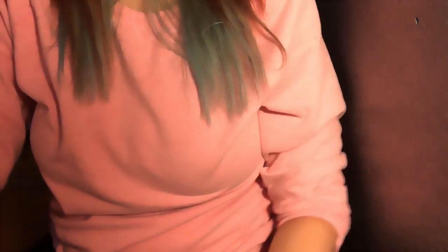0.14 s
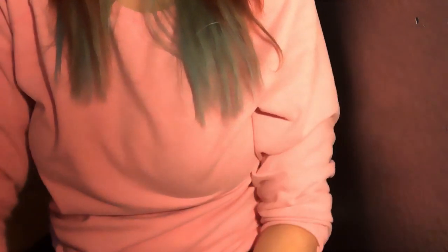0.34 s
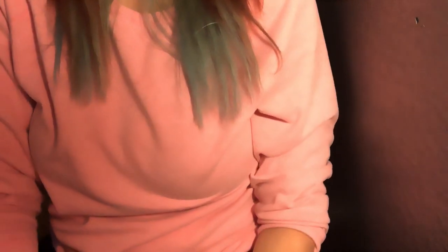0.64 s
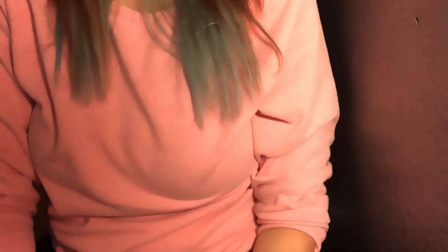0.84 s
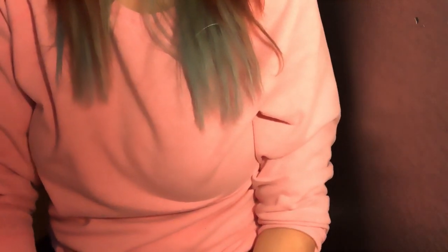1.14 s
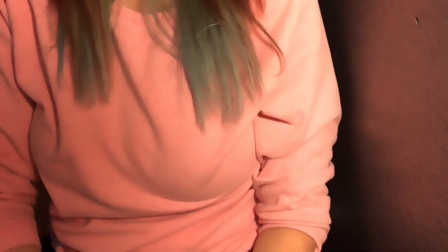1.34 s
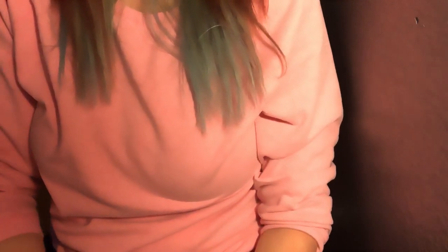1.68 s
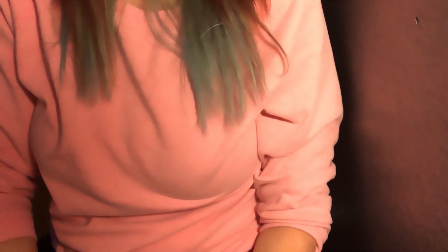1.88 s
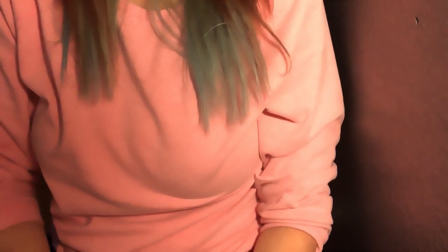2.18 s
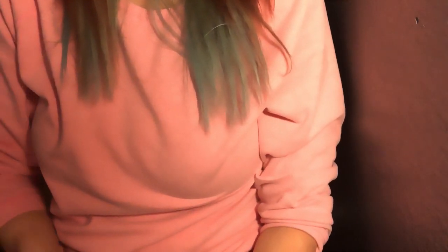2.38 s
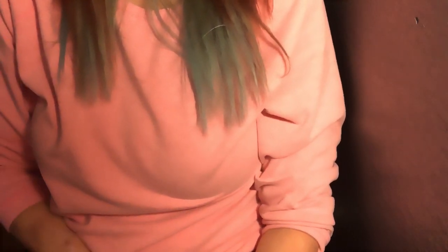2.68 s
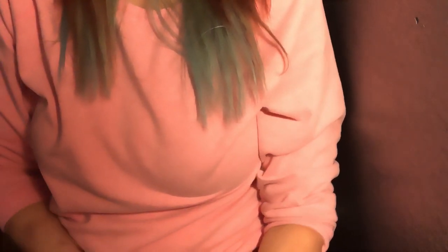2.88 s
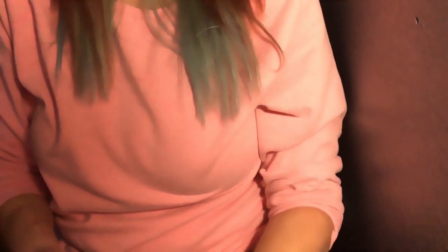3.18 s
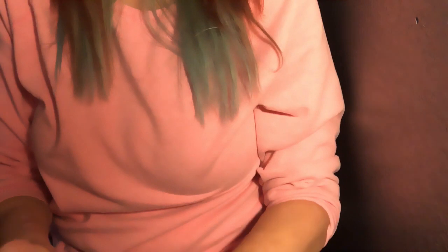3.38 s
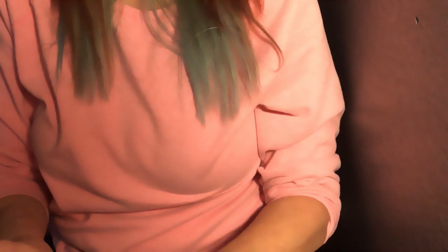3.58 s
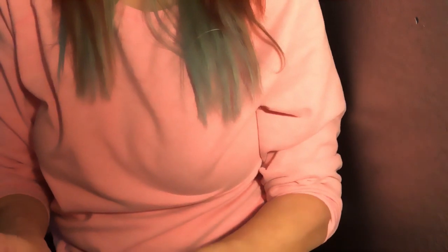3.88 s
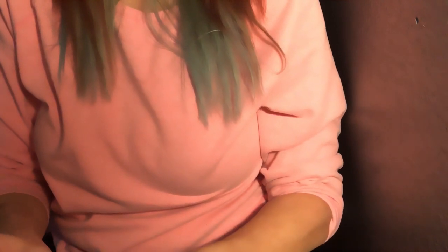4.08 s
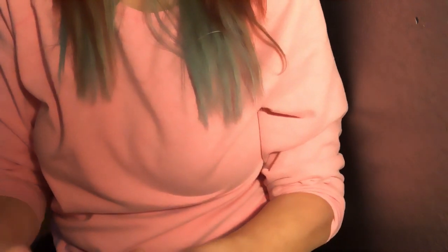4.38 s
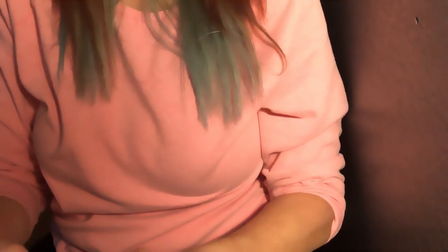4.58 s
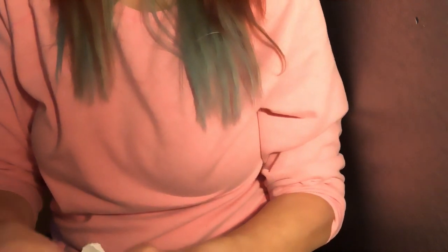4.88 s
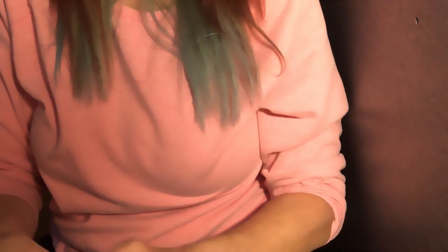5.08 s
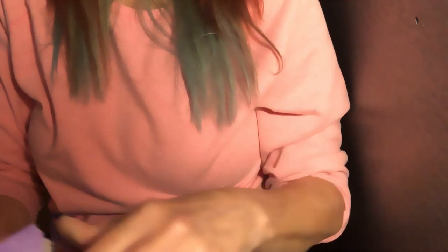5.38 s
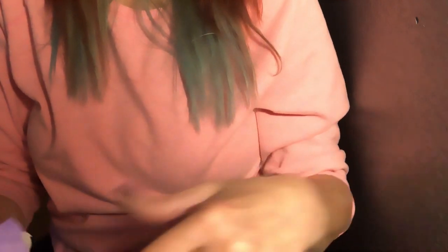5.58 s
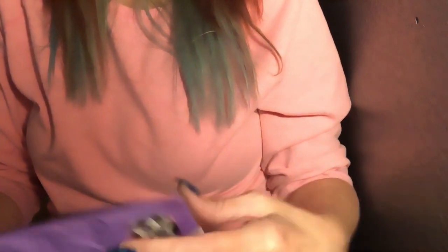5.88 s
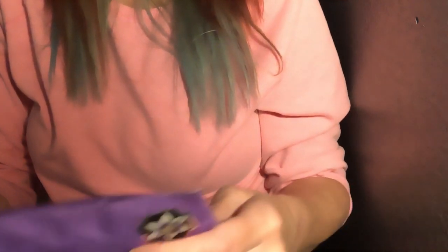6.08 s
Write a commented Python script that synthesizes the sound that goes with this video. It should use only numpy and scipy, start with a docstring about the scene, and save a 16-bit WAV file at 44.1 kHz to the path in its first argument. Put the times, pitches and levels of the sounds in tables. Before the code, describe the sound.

Hands tear open a paper envelope close to the microphone in a quiet room. Short, grainy rips and sharp snaps of creased paper come in irregular clusters through the first half. The handling then drops to faint ticks and rubbing before softer rustling and crinkling pick up again. The paper sounds slightly hollow, over a steady low hiss and faint hum.

```python
"""A paper envelope is crinkled and torn open by hand just above a desk, close-miked in a quiet room.
Creases snap one by one, each with a click, a short ring and a flap of the sheet. Fibres rip in dense
grains, and sliding fingers add softer swells of rustle. Air under and inside the envelope resonates
and gives the paper a hollow colour. Behind it sit a short room tail, steady hiss and a faint hum."""
import sys
import numpy as np
from scipy import signal
from scipy.fft import rfft, irfft, next_fast_len
from scipy.io import wavfile
from scipy.ndimage import uniform_filter1d

SR = 44100
rng = np.random.default_rng(int(sys.argv[2]) if len(sys.argv) > 2 else 0)


def unload_audio(sound):
    """Save the sound as a 16-bit wav file, at the path given as the first command line argument."""
    columns = np.transpose(np.atleast_2d(sound))
    # keep every value between -1 and 1, then stretch to whole-number steps
    steps = np.round(np.clip(columns, -1, 1) * 32767)
    wavfile.write(sys.argv[1], SR, steps.astype(np.int16))


N = 275625

# Tone of the room and microphone noise: f/Hz, level/dB
NOISE_EQ = [(21, -52), (35, 3), (98, 2.5), (167, -2), (342, -3), (587, -6), (955, -12.5), (1090, -13.5),
            (1680, -18.5), (2660, -21), (7050, -18.5), (14800, -25), (16000, -39)]
# Fingers slide over the sheet: t/s, hold/s, body level/dB, crackle/dB, flap/dB (last two re body)
FINGER_SLIDES = [(.08, 0.073, -60.5, -24, -6), (.2, 0.081, -59.5, 0.5, -4), (.725, 0.022, -50.5, 0, -10),
                 (.96, 0.018, -57.5, -16, -15), (1.645, 0.01, -54.5, 1.5, -2),
                 (1.78, 0.12, -58.5, -8, -6.5), (1.98, 0.15, -61.5, -3.5, -1), (2.3, 0.055, -59, -7, -7),
                 (2.82, 0.11, -60, 6.5, 1.5), (3.26, 0.008, -62.5, -1, 0), (3.32, 0.027, -64, 1.5, -2),
                 (3.45, 0.066, -66, 1, -1), (3.72, 0.098, -73.5, -2, 6), (3.94, 0.018, -68.5, 8, -4),
                 (4.09, .01, -71, 10, 0), (4.19, 0.018, -76.5, 6, -2), (4.57, 0.05, -66.5, -10.5, 1.5),
                 (4.74, 0.093, -55.5, 7, -2.5), (4.9, 0.14, -60, 1, -6), (5.31, 0.045, -58.5, 6, -9),
                 (5.42, 0.18, -57.5, 7, -9), (5.65, 0.14, -59, -2, -10), (5.84, 0.063, -64.5, 9, -15),
                 (6.03, 0.024, -55.5, 0, -9.5), (6.13, 0.16, -60, -2.5, -14)]
# Fibres rip, sudden and loud: t/s, hold/s, body level/dB, crackle/dB, flap/dB (last two re body)
FIBRE_RIPS = [(.363, 0.0058, -47, 3.5, -7), (.392, .005, -46, 3, -27), (.42, 0.014, -43.5, 7, -18),
              (.445, 0.04, -40.5, 6, -1.5), (.87, 0.03, -43.5, 4, -30), (1.215, 0.078, -55.5, 1, 1.5),
              (1.335, 0.048, -50.5, -1, -4), (1.43, 0.11, -47.5, 0.5, -5), (2.178, 0.011, -47.5, -5, -5.5),
              (2.38, 0.0114, -40.5, -4, -7.5), (2.49, .055, -48, 2.5, -2.5), (2.575, 0.043, -52, 5, -5),
              (2.903, 0.022, -51, -9, 0), (3.205, 0.014, -65, 4.5, 3), (3.563, 0.066, -58.5, 3.5, -5.5),
              (4.362, 0.079, -64.5, -12.5, -0.5), (4.69, 0.027, -52.5, 5, -6), (5.175, 0.065, -56, -6, -9),
              (5.595, .015, -56.5, -13, 7.5), (5.918, 0.0021, -50, -22, -17)]
# Creases snap: t/s, level/dB, length/ms, ring f/Hz, flap trim/dB, bite trim/dB, crackle trim/dB
CREASE_SNAPS = [(0.1888, -46, 2.5, 584, 9, -12, -5), (0.1999, -44, 2.6, 800, 13.5, -26, -15),
                (0.2043, -39, 2.7, 875, -2, -36, -18), (0.2538, -39, 2.3, 1090, -2.5, -11, -27),
                (0.3578, -26.5, 6.3, 1440, 0, 5, -2.5), (0.389, -34, 6.8, 4760, -23, -10, -8),
                (0.3992, -30, 2.8, 4500, -37, -11, 2), (0.423, -34, 3.8, 4850, -10, -14, -7),
                (0.4432, -19, 1.55, 5560, -9, -2, 0), (0.478, -30, 4.2, 840, -1, -1, -18),
                (0.518, -49, 2, 3970, -15, 4, -1), (0.8092, -46.5, 1.3, 1560, -13, -17, 10.5),
                (0.843, -45, 1.2, 2610, 4, -3, 9), (0.867, -37, 4.9, 2670, 1.5, -5, 9),
                (0.8892, -21, 2.38, 3300, -7.5, 16, 0), (0.9167, -34.5, 12, 2100, -9, 20, 3),
                (0.9237, -40, 8.2, 2180, -12, 2, -9), (1.022, -49.5, 1.26, 2450, -22, 4, 3),
                (1.0758, -45.5, 1.4, 5400, -19, 3, -3), (1.0804, -42, 1.2, 5440, -24, 3, 0),
                (1.2068, -16.5, 1.94, 5430, -4.5, 1, -5), (1.2409, -34.5, 1.27, 2400, 0, 41, 4.5),
                (1.279, -35, 3.8, 1530, -16, 25, 1.5), (1.3111, -29, 1.17, 2240, 5.5, 7, -16),
                (1.3208, -37.5, 13.3, 537, -3, -26, -6), (1.3377, -16, 3, 2310, -37, 5, -7),
                (1.4096, -38, 11, 2140, -20, 8, -3.5), (1.4243, -32.5, 1.55, 1660, 1.5, 2, -1),
                (1.4432, -26, 3.1, 950, -4.5, -5.5, -37), (1.4723, -29, 1.08, 2320, -16, 5, 5.5),
                (1.4785, -41, 3.4, 2380, -24, 0, 2), (1.4993, -26, 4.8, 2320, -12.5, 2.5, -8),
                (1.5276, -43.5, 5.8, 2500, -19, -12, 3), (1.5615, -37, 2.35, 2370, -31, 6, 1.5),
                (1.8377, -49, 1.3, 1610, -18, 2, 5), (1.8915, -50.5, 3.7, 2350, -22, 5, -0.5),
                (2.0425, -45, 1.26, 2500, -19, -3, 3), (2.0587, -49, 5.5, 2280, -1, 5, -2),
                (2.1692, -25.5, 5.1, 2820, -3.5, 14, -5.5), (2.2216, -47.5, 4.4, 2230, -19, 0, -1),
                (2.2739, -44.5, 1.1, 2330, -13, -4, 3), (2.2992, -58, 1.9, 2330, -14, -3, -7),
                (2.3201, -52.5, 2.9, 2450, 7, 0, 11), (2.3299, -39, 1.3, 2240, -24, 3, 1),
                (2.3358, -32, 0.69, 2390, -24, 1, 2), (2.36, -46, 2, 2400, -16, -11, -8),
                (2.3727, -26.5, 3.4, 3000, -5.5, 23, -5.5), (2.377, -30, 1.75, 2440, -13, -3, 4),
                (2.384, -34.5, 4.1, 4900, 1, -19, -5), (2.398, -44, 1.4, 730, 2, -10, -13),
                (2.4431, -38, 1.9, 2200, -5, 11, 2), (2.4595, -40, 1.4, 4000, -23, -9, -5),
                (2.4705, -42, 1.7, 1370, -24, 0, 4.5), (2.482, -24.5, 2.38, 1240, -7, 15, 0),
                (2.503, -55, 3.7, 2400, -10, 3, -8), (2.5307, -30.5, 14.5, 4250, -12, 16, 3),
                (2.568, -45, 1.3, 3500, -2, -6, 6), (2.6068, -38, 3.1, 2610, 4, 4, 9.5),
                (2.7829, -45, 3.7, 5250, -23, -13, 6), (2.7883, -47.5, 4.3, 4800, -11, 3, 6),
                (2.8003, -48, 2.3, 5190, -3, -4, 11), (2.8149, -41.5, 3.3, 596, 2.5, -8, -2),
                (2.8369, -42.5, 1.7, 517, -18, -4, 2), (2.8763, -33.5, 1.7, 950, 0.5, -9, -22),
                (2.8984, -23.5, 3.15, 2110, -7, 4, -15.5), (2.9827, -50.5, 11.4, 640, -3, -2.5, -2),
                (3.0965, -59, 3, 520, -9, 5, 4), (3.5541, -28, 2.5, 915, -5, 5.5, -39),
                (3.5591, -47.5, 6, 980, -9, -15.5, -2), (3.5726, -46, 1.4, 1710, -21, -23, -31),
                (3.7857, -48.5, 0.77, 1920, 5.5, -2, -15), (4.2133, -46, 1.58, 900, 7, -17, -12.5),
                (4.3433, -39.5, 1.2, 520, -11, 10, -17), (4.3682, -37, 2.7, 1670, -6.5, 33, -5),
                (4.6772, -44, 4.3, 1370, -2, 13, -1), (4.6896, -47.5, 8.3, 3340, 1, -10, 7),
                (4.8418, -37.5, 1.2, 890, -0.5, -19, -22), (4.9498, -41, 2.2, 530, 6.5, -16, -12),
                (5.0241, -55, 9.1, 1750, -5, 2, -14), (5.0654, -42, 1.8, 535, 0, -18, -15),
                (5.1643, -26.5, 1.82, 2080, -10, 7, -35), (5.2265, -45, 2.3, 1640, -1, -8, -15.5),
                (5.2539, -51.5, 4.6, 520, 12.5, -21, -21), (5.5355, -37.5, 0.78, 1780, 0, -18.5, -27),
                (5.5902, -35.5, 0.7, 1180, 1.5, -20, -14), (5.6017, -46.5, 2.2, 526, 2, -20, -14),
                (5.6855, -39.5, 3.75, 1530, 0.5, -6, -30), (5.7303, -47, 2.5, 1230, -2, -2, -1),
                (5.7357, -44, 4.8, 1510, 2, -28, -41), (5.9199, -33, 4.7, 1620, -4, 7, -16),
                (6.1154, -42.5, 0.95, 1860, 5.5, -8, -14), (6.1227, -33, 3.9, 580, -6, 9, -17.5),
                (6.1277, -45, 2.4, 1140, -2, 11, -18), (6.1594, -44.5, 3.6, 1230, 8, -7, -32)]
# Modes of the air gap under the envelope: f/Hz, width/Hz, level/dB
GAP_MODES = [(2320, 546, 1), (4960, 1100, -5.5), (7340, 920, 1.5), (10000, 1500, -1.5), (12230, 910, -1),
             (14900, 1300, 4)]
# Modes of the open pocket inside it: f/Hz, width/Hz, level/dB
POCKET_MODES = [(353, 120, -8.5), (950, 120, -10.5), (1545, 776, -1)]
# Sends into those two hollows over time: t/s, gap level/dB, pocket level/dB
HOLLOW_SENDS = [(0, 12, 3), (.3, 4, 12), (.7, 10.5, 3.5), (.9, 2.5, -3.5), (1.2, 7, 9.5), (1.4, 2.5, 4),
                (1.6, 13.5, 4), (2.3, 5.5, -1), (2.6, -2.5, 2), (2.9, 10.5, 11), (3.3, -10, 1.5),
                (3.6, 8, 20), (4.4, -8.5, 10.5), (5.0, -38, 6), (5.3, -3, -1), (5.6, -26, 4.5),
                (6.25, -9, 7)]
# Overall tone of the paper: f/Hz, level/dB
PAPER_EQ = [(200, 0.5), (400, 1), (900, -0.5), (1600, -2), (2500, -1.5), (4000, 5), (6000, 0), (9000, -3),
            (12000, -5.5), (16000, -11)]

BANDS_HZ = (150, 700, 6000, 17500)   # edges of the paper's three bands: flap, body, crackle
HELD_DB = (-82, -74, -78)   # the envelope at rest in the hands: flap, body, crackle


def from_db(db):
    """Decibels to linear gain."""
    return 10 ** (np.asarray(db) / 20)


def rms_one(x):
    """x scaled to rms 1."""
    return x / np.sqrt(np.mean(x ** 2) + 1e-20)


def equalise(x, curve):
    """x through an EQ curve drawn on a log-frequency axis."""
    size = next_fast_len(N)
    hz = np.maximum(np.arange(size // 2 + 1) * SR / size, 1)
    curve_hz, curve_db = np.transpose(curve)
    gain = from_db(np.interp(np.log(hz), np.log(curve_hz), curve_db))
    return irfft(rfft(x, size) * gain, size)[:N]


def resonance(x, hz, width_hz):
    """One resonant band-pass, unity gain at its peak."""
    r = np.exp(-np.pi * width_hz / SR)
    poles = [1, -2 * r * np.cos(2 * np.pi * hz / SR), r * r]
    return signal.lfilter(np.array([1, 0, -1]) * (1 - r * r) / 2, poles, x)


def paper_bands(flap, body, crackle):
    """The sheet's low flap, mid body and high crackle, each filtered to its own band."""
    return [signal.sosfilt(signal.butter(3, BANDS_HZ[k:k + 2], "band", fs=SR, output="sos"), x + 1e-18)
            for k, x in enumerate((flap, body, crackle))]


def drift(rate_hz):
    """Smooth random modulation, rms 1."""
    r = np.exp(-2 * np.pi * rate_hz / SR)
    return rms_one(signal.lfilter([1], [1, -2 * r, r * r], rng.standard_normal(N + SR))[SR:])


def room_tone(hiss_db=-68.5, hum_db=-76.5):
    """A steady bed of room and microphone noise with a faint wavering hum."""
    hiss = rms_one(equalise(rng.standard_normal(N), NOISE_EQ))
    hum = rms_one(resonance(rng.standard_normal(N), hz=102.1, width_hz=13))
    return from_db(hiss_db) * hiss + from_db(hum_db) * hum


def strokes(rows, rise_db_per_s, fall_db_per_s):
    """Power of flap, body and crackle as each hand stroke swells, holds and dies away."""
    t = np.arange(0, N + 64, 64) / SR
    power = 0
    for start, hold, body_db, crackle_db, flap_db in rows:
        attack_db = rise_db_per_s * np.maximum(start - t, 0)
        release_db = fall_db_per_s * np.maximum(t - start - hold, 0)
        band_db = body_db + np.array([[flap_db], [0], [crackle_db]])
        power = power + from_db(band_db - attack_db - release_db) ** 2
    return np.array([np.interp(np.arange(N) / SR, t, band) for band in power])


def hand_effort():
    """Flap, body and crackle levels in dB: gentle slides and sharp rips over the resting hold."""
    slides = strokes(FINGER_SLIDES, rise_db_per_s=169, fall_db_per_s=135)
    rips = strokes(FIBRE_RIPS, rise_db_per_s=896.5, fall_db_per_s=291)
    return 10 * np.log10(slides + rips + from_db(HELD_DB)[:, None] ** 2)


def rustle(effort_db, grains_per_s=6000, slide_db=-58, rip_db=-44, spread_db=3, clump_db=3, swell_db=1):
    """Fibres break in clumps of grains over the hiss of sliding fingers; harder pulls are rougher."""
    roughness = np.clip((effort_db[1] - slide_db) / (rip_db - slide_db), .25, 1)
    sizes = from_db(spread_db * roughness * np.minimum(rng.exponential(1, N), 4))
    grains = sizes * rng.choice([-1, 1], N) * (rng.random(N) < grains_per_s / SR)
    grains /= np.sqrt(uniform_filter1d(grains ** 2, size=2000) + 1e-9)   # even out the running level
    finger_hiss = 0.13 * rng.standard_normal(N)
    clumps = from_db(clump_db * roughness * drift(rate_hz=200) + swell_db * drift(rate_hz=20))
    texture = (grains + finger_hiss) * clumps
    bands = paper_bands(texture, texture, texture)
    return sum(from_db(db) * rms_one(band) for db, band in zip(effort_db, bands))


def shifting_folds(x, depth_db=2.2, rate_hz=8):
    """The folds shift under the fingers: half-octave bands swell and fade on their own."""
    edges_hz = np.minimum(600 * 2 ** np.arange(0, 5.1, .5), 18000)
    out = x
    for low, high in zip(edges_hz, edges_hz[1:]):
        band = resonance(x, np.sqrt(low * high), high - low)
        out = out + (from_db(depth_db * drift(rate_hz)) - 1) * band
    return out


def faint_creases(body_db, count=45, lift_db=7, spread_db=0.5):
    """Extra snap rows: small creases give way at random, as strong as the hands are busy."""
    rows = []
    for when, size, length, pitch in rng.random((count, 4)):
        level_db = body_db[int(when * N)] + lift_db + spread_db * (2 * size - 1)
        rows.append((when * N / SR, level_db, 5 * (0.36 + length), 900 * 3.5 ** pitch, -5, 4, -2))
    return rows


def snaps(rows, ring_q=1.74, bite_db=3, flap_db=10, flap_stretch=1.91):
    """A crease gives with a click and a burst of micro-breaks; a patch rings and the sheet flaps after."""
    span = 2048   # samples per snap
    t = np.arange(span) / SR
    tracks = np.zeros((3, N + span))
    for start, level_db, ms, hz, flap_trim, bite_trim, crackle_trim in rows:
        body_noise, flap_noise, crackle_noise = rng.standard_normal((3, span))
        length_s = ms / 1000
        age = t / length_s
        burst_shape = age ** 1.3 * np.exp(-3.5 * age)
        flap_shape = age ** 1.95 * np.exp(-3.5 * age / flap_stretch)
        click = np.zeros(span)
        click[np.argmax(burst_shape)] = np.linalg.norm(burst_shape) / max(ms, 1)
        burst = body_noise * burst_shape + click
        ring = resonance(resonance(burst, hz, hz / ring_q), hz, 2 * hz / ring_q)
        bite = from_db(bite_db + bite_trim) * rms_one(burst)   # hard creases bite, soft ones only ring
        body = rms_one(rms_one(ring) + bite)
        flap = from_db(flap_db + flap_trim) * rms_one(flap_noise * flap_shape)
        crackle = from_db(crackle_trim) * rms_one(crackle_noise * burst_shape + click)
        gain = from_db(level_db) * np.sqrt(length_s * SR / span)
        onset = round(start * SR)
        tracks[:, onset:onset + span] += gain * np.array([flap, body, crackle])
    out = sum(paper_bands(*tracks[:, :N]))
    for pole in (.93, .93, .88):   # bending waves: the lows travel slower and arrive later
        out = signal.lfilter([-pole, 1], [1, -pole], out)
    return out


def trapped_air(x, coupling_db):
    """Air in the gap over the desk and in the open pocket resonates, turning the paper hollow."""
    times, *sends = np.transpose(HOLLOW_SENDS)
    gap_db, pocket_db = [np.interp(np.arange(N) / SR, times, send) for send in sends]
    overtones_db = 0.43 * gap_db - 1.5   # the gap's higher modes rise with its lowest
    out, power = x, 1
    for modes, send_db in ((GAP_MODES[:1], gap_db), (GAP_MODES[1:], overtones_db),
                           (POCKET_MODES, pocket_db)):
        gain = from_db(send_db + coupling_db)
        ringing = sum(from_db(db) * resonance(x, hz, width_hz) for hz, width_hz, db in modes)
        out = out + gain * ringing
        power = power + 0.62 * gain ** 2
    return out / np.sqrt(power)   # pull the level back as the sends rise


def room_tail(x, t60_s=0.12, wall_cut_hz=7200):
    """Wall reflections from sixteen feedback delays, duller on every bounce."""
    size = next_fast_len(N + SR // 2)
    omega = 2 * np.pi * np.arange(size // 2 + 1) / size
    damping = 1 / (1 + 1j * omega * SR / (2 * np.pi * wall_cut_hz))
    lags = (np.geomspace(.0031, .0291, num=16) * SR).astype(int)
    walls = 0
    for k, lag in enumerate(lags):
        bounce = from_db(-60 * lag / SR / t60_s) * damping * np.exp(-1j * omega * lag)
        walls = walls + (-1) ** k * bounce / (1 - bounce)
    return irfft(rfft(x, size) * walls, size)[:N]


def scene(tail_db=-22.5):
    """The mono mix: close paper over the desk, a touch of room tail and the room tone."""
    effort_db = hand_effort()
    rubbing = shifting_folds(rustle(effort_db))
    creases = snaps(CREASE_SNAPS + faint_creases(body_db=effort_db[1]))
    # rubbing drives the trapped air harder than creases out at the edge
    paper = trapped_air(rubbing, coupling_db=6) + trapped_air(creases, coupling_db=2)
    paper = equalise(paper, PAPER_EQ)
    return (paper + from_db(tail_db) * room_tail(paper) + room_tone())[None]


def record(dry):
    """A steep high cut takes off the very top."""
    return signal.sosfilt(signal.cheby2(16, 70, 16800, fs=SR, output="sos"), dry)


dry = scene()
out = record(dry)
unload_audio(out)
```